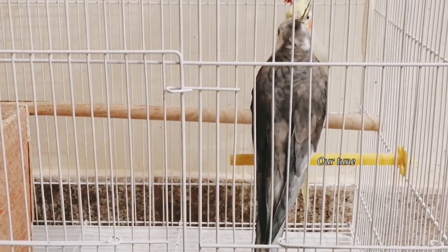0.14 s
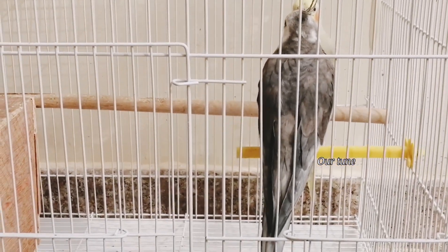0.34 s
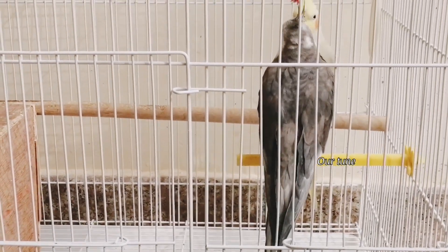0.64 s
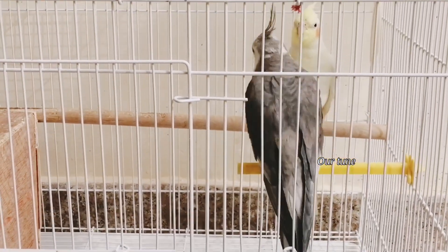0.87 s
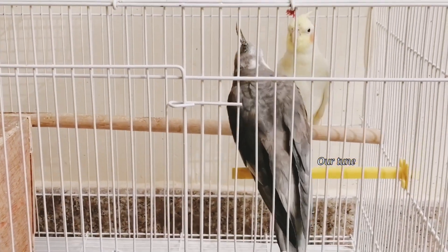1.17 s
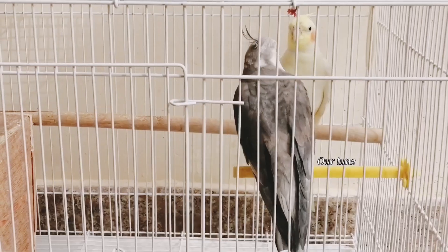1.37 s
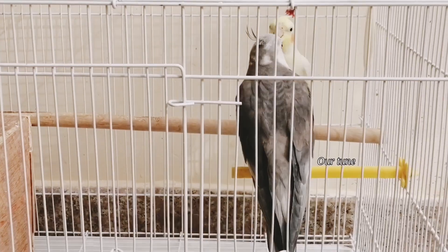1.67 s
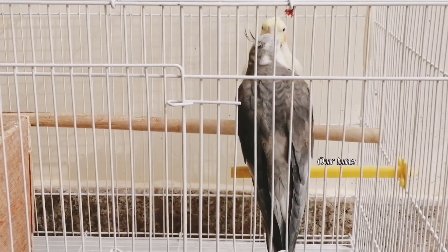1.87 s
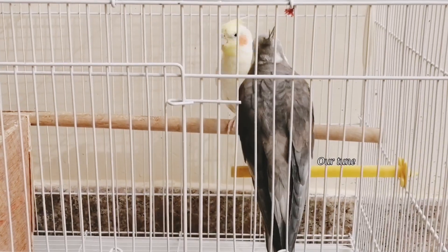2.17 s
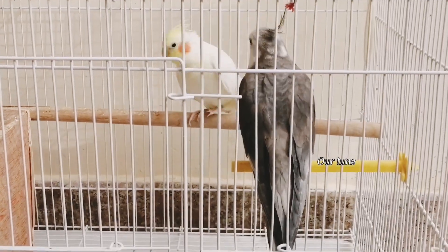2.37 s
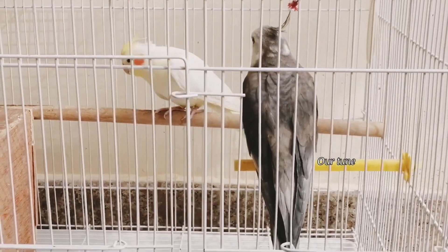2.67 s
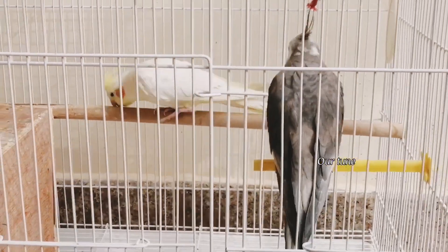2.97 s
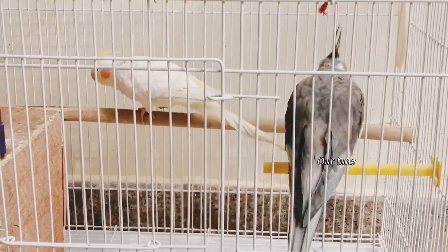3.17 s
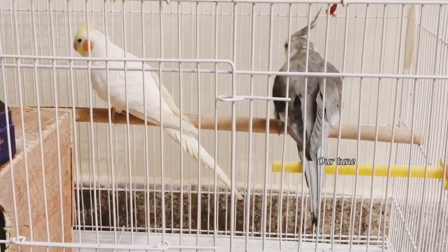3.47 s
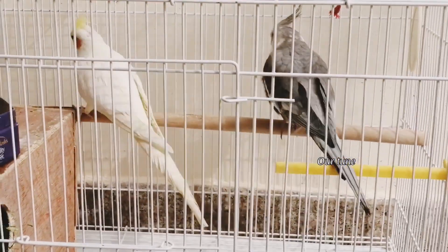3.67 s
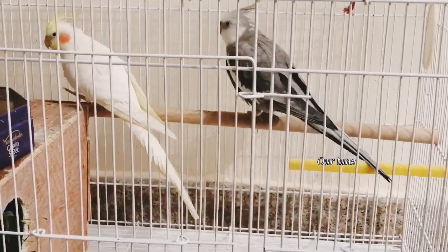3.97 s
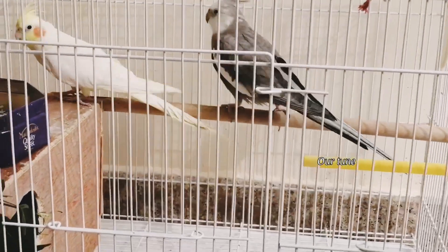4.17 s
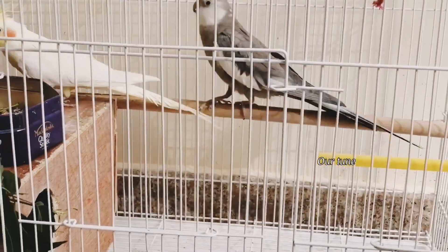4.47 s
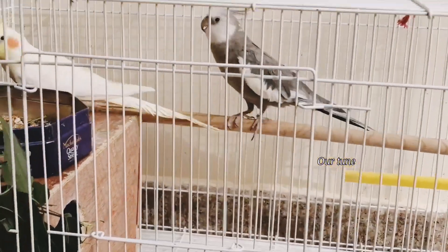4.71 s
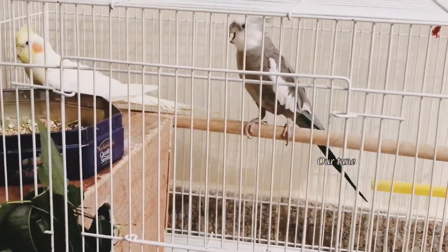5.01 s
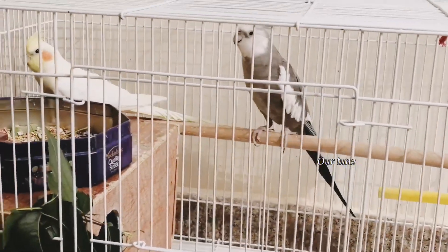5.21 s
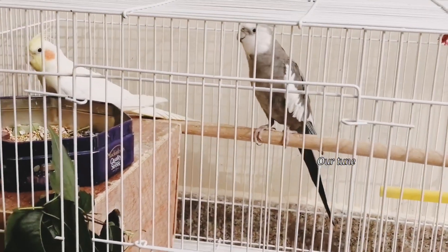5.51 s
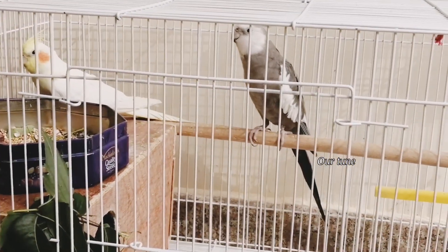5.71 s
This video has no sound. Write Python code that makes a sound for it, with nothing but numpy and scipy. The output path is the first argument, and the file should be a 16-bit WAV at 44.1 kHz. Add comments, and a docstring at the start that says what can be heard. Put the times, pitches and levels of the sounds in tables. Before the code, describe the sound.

Two bursts of cockatiel chirps indoors, with low, irregular microphone buffeting and popping between them over faint hiss.

```python
"""Cockatiels in a draughty room

Two cockatiels whistle in a wire cage in a bare, ringing room, each syrinx a gliding, nearly pure tone.
Claws now and then excite the modes of perch and wire; other small birds chirp further off.
Eddies in a draught buffet the two microphone ports, the right one hardest.
Under it all lies a soft hiss, and a faint hum swells near the end."""
import sys
import numpy as np
from scipy import signal
from scipy.fft import rfft, irfft, next_fast_len
from scipy.io import wavfile

SR = 44100
rng = np.random.default_rng(int(sys.argv[2]) if len(sys.argv) > 2 else 0)


def log_audio(samples):
    """Write samples as a 16-bit WAV file to the path given in sys.argv[1]."""
    # one column per channel
    frames = np.atleast_2d(samples).T
    # limit to full scale, then quantise
    limited = np.clip(frames, -1, 1)
    pcm = np.round(limited * 32767).astype(np.int16)
    wavfile.write(sys.argv[1], SR, pcm)


N = 257984
CUTOFF_HZ = 15900


def syrinx(at, hz, level_db, over_db, third_db, fourth_db, higher_db, breath_db, hoarse, pan_db):
    """Self-sustained oscillation with harmonics and breath; uneven cycles add bands halfway between."""
    # harmonic number, level/dB relative to over_db
    partials = [(2, -5.5), (3, -9), (4, -16.5), (5, -17), (6, -29)]
    size = len(at)
    phase = 2 * np.pi * np.cumsum(hz * (1 + hoarse * flutter(size, 140))) / SR
    overtones = 0
    for k, db in partials:
        trim_db = (k == 3) * third_db + (k == 4) * fourth_db + (k > 4) * higher_db
        overtones += amp(db + trim_db) * np.sin(k * phase) * (k * hz < CUTOFF_HZ)
    half_orders = sum(gain * np.sin(k * phase / 2) for k, gain in [(1, 1), (3, .24), (5, .3), (7, .082)])
    rasp_db = np.minimum(-56.5 - 1.9 * (level_db + 24), -20)   # a weaker voice is rougher
    rasp = amp(rasp_db) * flutter(size, 110) * half_orders
    breath = amp(breath_db) * butter(rng.standard_normal(size), [6500, 11500], "band")
    onset = amp(-30) * np.exp(-(at - at[0]) / SR / .01)   # a short scratch of air
    scratch = onset * butter(rng.standard_normal(size), [1300, 2200], "band")
    tone = np.sin(phase) + amp(over_db) * overtones + rasp + breath + scratch
    stutter = amp(54 * hoarse * flutter(size, 53))
    pan = amp([[pan_db / 2], [-pan_db / 2]])
    return pan * amp(level_db) * fade(at / SR, edge_s=.0058) * stutter * tone


def cockatiels():
    """Frequency and amplitude modulation: each whistle glides, then decays on its last pitch."""
    # per whistle, a voice: third, fourth, higher partials/dB, breath/dB, pitch jitter/1, left-right/dB
    # and a course: t/s, f/Hz, level/dB, overtones/dB as the beak opens
    whistles = [ ((3, -12.5, -0.5, -43, -0.0167, 7.5), [(.915, 2207, -22.5, -39.5), (.938, 2340, -33, -16),
                (.96, 2695, -20, -22), (.99, 2907, -21, -19.5), (1.03, 3045, -22.5, -19.5),
                (1.06, 3135, -31.5, -25.5), (1.14, 3116, -29, -40.5)]), ((0, -13.5, -5, -45, 0.0158, 5.5),
                [(1.205, 2290, -29, -18), (1.23, 2590, -25, -9.5), (1.25, 2994, -21.5, -20),
                (1.275, 3112, -16, -29), (1.3, 3160, -30, -29)]), ((4.5, -15.5, 1.5, -46, 0.0177, 6),
                [(1.468, 2630, -31.5, -23), (1.49, 2478, -34.5, -12), (1.515, 2582, -25.5, -19),
                (1.522, 2640, -19.5, -22.5), (1.55, 2744, -18.5, -22.5), (1.585, 2750, -27, -24.5)]),
                ((-1.5, -8, 1, -43.5, -0.0163, 6), [(1.588, 2156, -25, -20), (1.61, 3000, -28, -29),
                (1.64, 3104, -36, -27.5)]), ((2.5, 3.5, 4, -50.5, 0.0137, 6.5), [(1.69, 2024, -23.5, -17),
                (1.72, 2270, -26, -20), (1.74, 2530, -22.5, -20), (1.75, 2857, -22, -18),
                (1.775, 2925, -21, -32.5), (1.82, 2915, -31, -30)]),
                ((-3.5, 1.5, -16.5, -30.5, 0.0216, 6.5), [(4.45, 2058, -31.5, -6),
                (4.48, 2404, -18.5, -19.5), (4.505, 2882, -19, -15), (4.55, 3000, -20, -14),
                (4.61, 3100, -21, -18), (4.64, 3100, -35.5, -9), (4.72, 3082, -30, -14),
                (4.74, 2596, -25.5, -17)]), ((-3, 1, -22, -42, 0.0117, 2), [(4.745, 2454, -19, -24.5),
                (4.785, 2693, -22, -5.5), (4.805, 3225, -13.5, -21), (4.84, 3205, -27.5, -13.5),
                (4.87, 3204, -24, -27)]), ((-6.5, -5, -6.5, -57.5, -0.0005, 3), [(4.995, 2338, -26.5, -8),
                (5.03, 2339, -20.5, 3.5), (5.09, 2413, -20, -2.5), (5.13, 2228, -29, -11),
                (5.16, 2111, -23, -16), (5.21, 2175, -25.5, -20.5)]), ((-1, -14.5, -3.5, -40, 0.0093, 3.5),
                [(5.216, 2947, -29.5, -20), (5.25, 3125, -22.5, -25), (5.285, 2862, -21, -18.5),
                (5.3, 2070, -25, -26), (5.335, 1800, -28.5, -24), (5.365, 1951, -32, -23.5),
                (5.385, 1500, -34.5, -13)]), ((2.5, -4.5, -5.5, -51, 0.021, 6.5), [(5.5, 1807, -35, -8),
                (5.54, 1762, -32.5, -13), (5.58, 1754, -25, -28), (5.62, 1685, -32.5, -20.5),
                (5.66, 1665, -32, -16.5), (5.69, 1609, -37.5, -25)]), ((-8.5, -7, 9.5, -43, 0.0109, 8),
                [(5.695, 1610, -34, -36), (5.715, 2122, -20, -39.5), (5.74, 2454, -19, -26.5),
                (5.76, 2477, -30.5, -23), (5.775, 2465, -17, -26.5), (5.8, 2450, -33, -40)]),
                ((1, 8, 0, -45.5, 0.01, -2), [(5.77, 1890, -26.5, -43), (5.795, 1400, -35.5, -35),
                (5.81, 1404, -39, -31)])]
    release_s, release_db_per_s = .031, 400.5
    out = np.zeros((2, N))
    for voice, course in whistles:
        times, *columns = np.transpose(course)
        at = np.arange(int(times[0] * SR), min(N, int((times[-1] + release_s) * SR)))
        hz, level_db, over_db = [np.interp(at / SR, times, c) for c in columns]
        level_db -= release_db_per_s * np.maximum(at / SR - times[-1], 0)
        out[:, at] += syrinx(at, hz, level_db, over_db, *voice)
    return out


def eddies(per_s, spread_db, low_hz, high_hz):
    """Turbulence as shot noise: uneven pressure pulses come in clumps; steady pressure leaks away."""
    born = rng.random(N) < per_s * amp(3 * flutter(N, 12)) / SR
    sizes = amp(spread_db * np.minimum(rng.exponential(1, N), 4))
    pulses = born * sizes * np.where(rng.random(N) < .7, 1, -1)
    narrow = rng.random(N) < .4
    pressure = butter(pulses * ~narrow + 1e-18, high_hz, "low", order=4)
    pressure += .34 * butter(pulses * narrow + 1e-18, 1.51 * high_hz, "low", order=4)
    return rms_one(butter(pressure, low_hz, "high"))


def draught():
    """Turbulent pressure: broad eddies rumble on both ports, small ones patter on the right."""
    # t/s, right rumble/dB, right patter/dB, left rumble/dB
    wind = [(0.0, -45, -60.5, -52), (.35, -53, -62, -55), (.5, -44.5, -62, -55), (.7, -36.5, -65, -53),
            (.9, -58.5, -62, -56.5), (1.2, -55, -70.5, -61.5), (1.7, -58, -67.5, -59),
            (1.92, -34, -63, -66), (2.099, -41, -56, -30), (2.16, -31, -52, -42), (2.19, -23.5, -21, -57),
            (2.35, -21, -25, -37), (2.5, -30, -46.5, -46), (2.7, -42, -61, -40), (2.84, -36, -52, -32),
            (2.95, -24, -32.5, -32), (3.1, -27.5, -30.5, -45), (3.2, -25, -47, -37),
            (3.4, -28.5, -43.5, -36.5), (3.6, -30.5, -36, -33), (3.75, -29.5, -45.5, -40),
            (3.95, -26, -40, -43.5), (4.199, -28.5, -34.5, -38.5), (4.38, -31, -46, -51),
            (4.65, -39, -61.5, -60), (4.95, -50, -76, -58.5), (5.15, -44, -53.5, -45.5),
            (5.32, -47, -61.5, -48), (5.41, -37.5, -53.5, -54), (5.55, -45, -59, -41.5),
            (5.719, -44.5, -53, -35.5), (5.85, -37, -39.5, -45)]
    times, *columns = np.transpose(wind)
    right_db, patter_db, left_db = [np.interp(np.arange(N) / SR, times, c) for c in columns]
    left = amp(left_db + flutter(N, 3.3)) * eddies(300, 2.5, low_hz=28.4, high_hz=110)
    gust_db = 3 * flutter(N, 9)
    right = amp(right_db + gust_db) * eddies(300, 3.5, low_hz=31, high_hz=126.3)
    patter = amp(patter_db + gust_db) * eddies(200, 4.8, low_hz=200, high_hz=292)
    return np.array([left, right + patter])


def buffets():
    """Pressure transients: single large eddies hit the right port, each a sharp pop and then a thump."""
    # t/s, thump level/dB, thump width/ms, pop level/dB
    hits = [(.434, -23.5, 2.9, -55), (0.711, -12, 3.9, -49), (1.994, -20, 1.82, -49.5),
            (2.181, -22, 1.7, -14), (2.191, -18.5, 1.35, -9.5), (2.217, -8.5, 1.9, -24.5),
            (2.233, -22, 1.3, -21), (2.258, -9, 1.4, -22), (2.322, -15.5, 1.4, -10.5),
            (2.35, -17.5, 3, -11.5), (2.369, -9.5, 1.5, -25), (2.407, -12, 1.06, -38.5),
            (2.453, -16.5, 1.6, -26.5), (2.543, -15, 2.97, -48), (2.687, -18.5, 3.8, -49),
            (2.917, -18, 1.9, -25), (2.929, -24, 1.23, -17.5), (2.951, -16, 2.9, -43),
            (3.001, -11, 3.6, -18), (3.037, -13, 1.17, -26), (3.099, -25, 1.3, -12),
            (3.109, -7.5, 1.8, -8.5), (3.236, -12, 1.67, -16.5), (3.397, -13.5, 3.4, -53),
            (3.483, -18.5, 1.87, -32), (3.536, -27, 1.6, -32), (3.553, -14.5, 1.2, -33.5),
            (3.591, -17, 1.4, -23.5), (3.622, -15, 1.47, -24), (3.931, -13.5, 1.3, -33),
            (3.959, -12.5, 1.12, -39), (3.969, -17, 1.5, -21), (4.04, -8, 3.9, -48.5),
            (4.155, -13.5, 1.5, -20), (4.172, -7.5, 2.1, -40), (4.336, -14, 2.8, -50),
            (4.388, -19.5, 1.27, -31), (4.513, -21.5, 1.6, -48), (4.555, -24, 1.53, -52),
            (4.633, -25, 2.6, -57), (5.367, -22, 1.9, -54.5), (5.415, -14, 1.87, -43),
            (5.437, -17.5, 1.8, -50), (5.775, -15.5, 3.2, -46), (5.838, -14.5, 2.9, -25.5)]
    pop_lead_ms, pop_width_ms = 2.45, .5
    ms = (np.arange(2200) - 1000) * 1000 / SR
    out = np.zeros((2, N))
    for (at_s, thump_db, width_ms, pop_db), sign in zip(hits, rng.choice([-1, 1], len(hits))):
        u, v = ms / width_ms, (ms + pop_lead_ms) / pop_width_ms
        thump = 1.15 * np.exp(-2.5 * u * u) - .5 * np.exp(-.3 * (u - .6) ** 2)   # push, then slower pull
        pop = sign * (1 - v * v) * np.exp(-v * v / 2)
        start = int(at_s * SR) - 1000
        out[1, start:start + len(ms)] += (amp(thump_db) * thump + amp(pop_db) * pop)[:N - start]
    return out


def strike(times, levels_db, modes):
    """Impulse response of damped modes; each blow excites each mode with its own strength."""
    out = 0
    for hz, mode_db, t60 in modes:
        blows = np.full(N, 1e-18)
        blows[(times * SR).astype(int)] = amp(levels_db + mode_db + rng.normal(0, .67, len(times)))
        radius, angle = amp(-60 / (t60 * SR)), 2 * np.pi * hz / SR
        out += signal.lfilter([0, np.sin(angle)], [1, -2 * radius * np.cos(angle), radius ** 2], blows)
    return out


def claws():
    """Impact excitation: claws set the wooden perch and the cage wire ringing."""
    # taps: t/s, wood level/dB, wire level/dB
    taps = [(.285, -56, -50), (4.057, -33.5, -43), (4.221, -50.5, -46.5), (4.325, -41, -38.5),
            (4.491, -50, -56), (4.618, -41.5, -72), (4.96, -48, -43.5)]
    # modes of perch and wire: f/Hz, level/dB, T60/s
    perch = [(380, -4, .05), (520, -1, .05), (650, -2, .04), (800, -4, .04), (960, -1, .04),
             (1150, -6, .03), (1600, -12, .02), (2350, -20, .015)]
    wire = [(3300, -8, .004), (5500, -4, .003), (7000, -4, .003), (8500, -1, .003), (9800, 1, .003),
            (11500, -2, .003), (13500, -3, .002)]
    times, wood_db, wire_db = np.transpose(taps)
    return strike(times, wood_db, perch) + strike(times, wire_db, wire)


def far_birds():
    """Exponential frequency sweeps, roughened by random frequency modulation."""
    # t/s, duration/s, first f/Hz, last f/Hz, level/dB, pitch jitter/1
    chirps = [(0.332, 0.06, 5820, 5070, -61, 0.25), (0.374, 0.061, 4970, 5080, -44, 0.042),
              (0.444, 0.067, 6270, 3310, -51, 0.078), (0.539, 0.035, 1964, 2200, -57, 0.12),
              (0.586, 0.049, 5070, 4976, -64.5, 0.025), (0.81, 0.055, 7600, 7650, -61.5, 0.0076),
              (0.831, 0.035, 7350, 4380, -46, 0.024), (2.13, 0.066, 5330, 5210, -71.5, 0.014),
              (2.364, 0.09, 5130, 4830, -70, 0.04), (2.444, 0.054, 3184, 3400, -50, 0.026),
              (2.52, 0.27, 3350, 3383, -65.5, 0.036), (2.587, 0.062, 7000, 3965, -57, 0.044),
              (2.7, 0.041, 1955, 2450, -65.5, .02), (2.787, 0.076, 6870, 4240, -63.5, 0.1),
              (3.459, 0.051, 5100, 5120, -73.5, 0.006), (3.556, 0.055, 5200, 5170, -72, 0.005),
              (3.791, 0.035, 7000, 4840, -66.5, 0.037), (3.9, 0.037, 2300, 2630, -64, 0.025),
              (4.079, 0.066, 5100, 4990, -65, 0.031), (4.196, 0.074, 3360, 3350, -67.5, 0.052)]
    out = np.zeros(N)
    for start_s, length_s, first_hz, last_hz, level_db, jitter in chirps:
        at = np.arange(int(start_s * SR), int((start_s + length_s) * SR))
        hz = np.geomspace(first_hz, last_hz, len(at)) * (1 + jitter * flutter(len(at), 600))
        phase = 2 * np.pi * np.cumsum(hz) / SR
        tone = np.sin(phase) + .091 * np.sin(2 * phase)
        out[at] += amp(level_db) * fade(at / SR, edge_s=.008) * tone
    return out


def walls(x):
    """Early reflections, slightly scattered, interfere with a gliding whistle and beat against it."""
    # delay/s, left level/dB, right level/dB
    echoes = [(.011, -15.5, -1.5), (.024, -7, -5), (.041, -8.5, -7)]
    t, response = np.arange(int(.06 * SR)) / SR, 0
    for delay_s, left_db, right_db in echoes:
        scatter = rng.standard_normal((2, len(t))) * np.exp(-((t - delay_s) / .00031) ** 2)
        scatter /= np.linalg.norm(scatter, axis=1, keepdims=True)
        response += amp([[left_db], [right_db]]) * scatter
    return signal.fftconvolve(x, response, axes=1)[:, :N]


def room(x):
    """Diffuse reverberation: each half-octave band decays at its own rate, uncorrelated at the ports."""
    # reverberation time: f/Hz, T60/s
    decay_times = [(300, 0.1), (2000, 0.57), (5000, 0.57), (10000, 0.27), (16000, 0.22)]
    early_t60_s, first_echo_s = .05, .0017
    t, tail = np.arange(int(1.2 * SR)) / SR, 0
    edges = 180 * 2. ** np.arange(0, 6.6, .5)
    early = amp(4.5 - 60 * t / early_t60_s)   # the near walls answer first and fade fast
    for low, high in zip(edges, edges[1:]):
        band = butter(rng.standard_normal((2, len(t))), [low, high], "band")
        late = amp(-60 * t / at_hz(decay_times, np.sqrt(low * high)))
        tail += band * (early + late)
    tail *= np.clip(t / first_echo_s - 1, 0, 1)
    return signal.fftconvolve(x, tail * np.sqrt(30 / SR), axes=1)[:, :N]


def ports(x):
    """Each port has its own frequency response; sound reaches the right one later."""
    # f/Hz, left gain/dB, right gain/dB
    response = [(1500, -5, -3), (3000, -2, -1.14), (4586, 1, -2), (5947, 0.55, -6.5), (8800, 5.5, -15),
                (10900, -2.5, -10), (11900, -1, -10.5), (15000, -1.5, 7.5)]
    lag_s, size = 88e-6, next_fast_len(N + 4096)
    hz, rows = np.fft.rfftfreq(size, 1 / SR), np.array(response)
    left = amp(at_hz(rows[:, [0, 1]], hz))
    right = amp(at_hz(rows[:, [0, 2]], hz)) * np.exp(-2j * np.pi * hz * lag_s)
    return irfft(rfft(x, size) * [left, right], size)[:, :N]


def air():
    """Broadband room and microphone noise, partly coherent between the ports in the bass."""
    # f/Hz, relative spectral density/dB
    spectrum = [(88, -23.5), (150, -11.5), (484, -11.5), (998, -10), (1560, -19.5), (3040, -22),
                (3770, -28.5), (5150, -25), (6140, -30), (8730, -23.5), (10800, -32.5), (14800, -28.5),
                (16000, -50.5)]
    shared, *own = rng.standard_normal((3, N))
    hz = np.fft.rfftfreq(N, 1 / SR)
    coherence = .16 / (1 + (hz / 600) ** 2)
    mix = np.sqrt(coherence) * rfft(shared) + np.sqrt(1 - coherence) * rfft(own)
    hiss = rms_one(irfft(mix * amp(at_hz(spectrum, hz)), N))
    swell = (amp(.82 * flutter(N, 3.3)) - 1) * butter(hiss, 4300, "low")
    return amp(-63.5) * (hiss + swell)


def hum():
    """A faint pure tone under a slow amplitude envelope."""
    # t/s, level/dB
    swell = [(5.26, -65), (5.36, -63.5), (5.6, -53), (5.85, -67.5)]
    t, hz = np.arange(N) / SR, 311.5
    return amp(np.interp(t, *np.transpose(swell), left=-120)) * np.sin(2 * np.pi * hz * t)


def amp(db):
    return 10 ** (np.asarray(db) / 20)


def rms_one(x):
    return x / np.sqrt(np.mean(x ** 2) + 1e-20)


def at_hz(points, hz):
    """Interpolation on a logarithmic frequency axis."""
    knots_hz, values = np.transpose(points)
    return np.interp(np.log(hz + 1), np.log(knots_hz), values)


def butter(x, hz, kind, order=2):
    return signal.sosfilt(signal.butter(order, hz, kind, fs=SR, output="sos"), x)


def flutter(size, hz):
    """Low-pass noise of unit RMS."""
    return rms_one(butter(rng.standard_normal(size + 2000), hz, "low")[2000:])


def fade(t, edge_s):
    """Linear ramps at both ends of a note."""
    return np.clip(np.minimum(t - t[0], t[-1] - t) / edge_s, 0, 1)


def scene():
    """Superposition of direct, reflected and diffuse sound with wind and noise at the ports."""
    calls, taps = cockatiels(), claws()
    far = far_birds() * amp([[1.5], [-1.5]])
    shaded = butter(calls, 7000, "low", order=1)   # the birds' heads shade the treble
    direct = shaded + .48 * taps + .1 * far
    reflected = walls(calls + .2 * taps + .3 * far)
    airborne = amp(2.5) * (direct + reflected) + amp(.5) * room(calls + taps + far)
    return ports(airborne) + draught() + buffets() + air() + hum()


def record(dry):
    """Band limiting: a steep low-pass filter removes the top of the treble."""
    return signal.sosfilt(signal.cheby2(14, 70, CUTOFF_HZ, fs=SR, output="sos"), dry)


dry = scene()
out = record(dry)
log_audio(out)
```